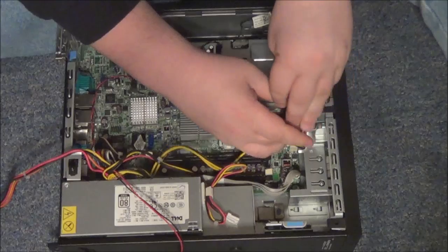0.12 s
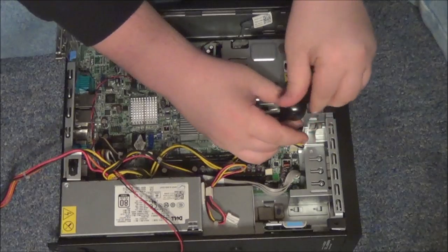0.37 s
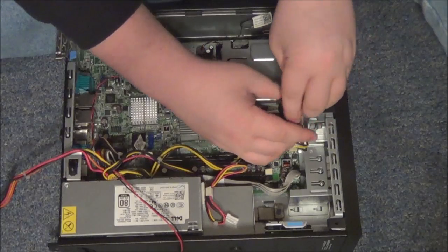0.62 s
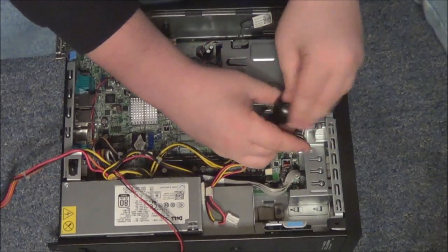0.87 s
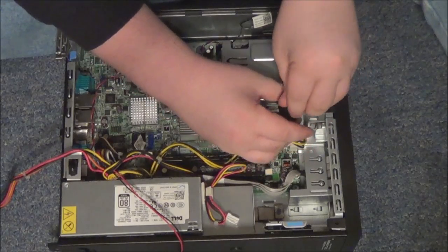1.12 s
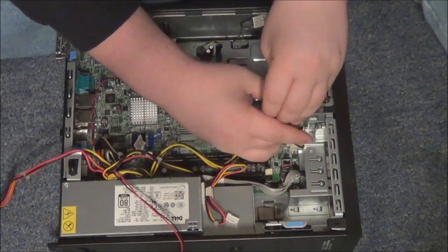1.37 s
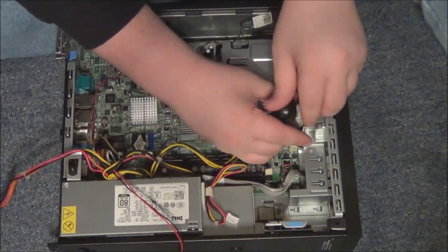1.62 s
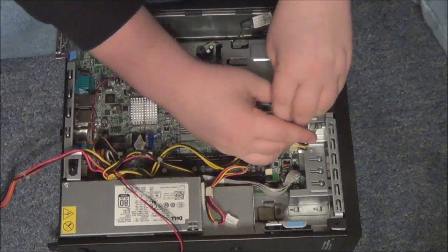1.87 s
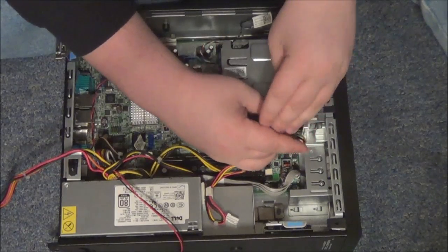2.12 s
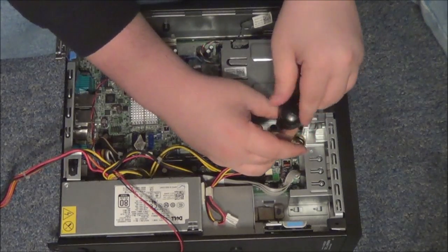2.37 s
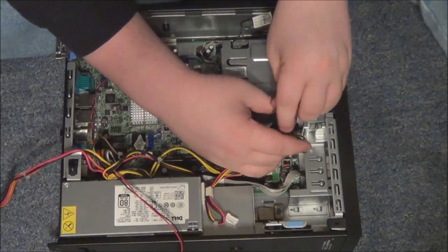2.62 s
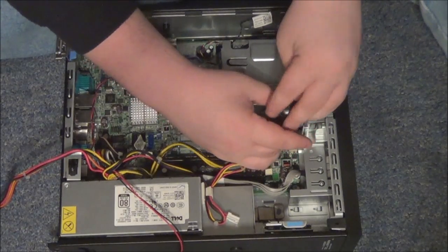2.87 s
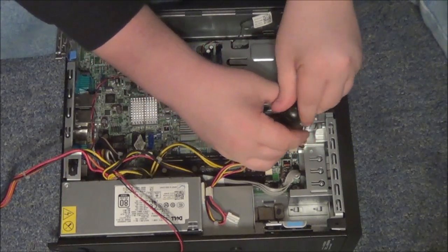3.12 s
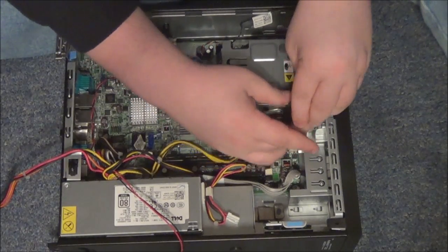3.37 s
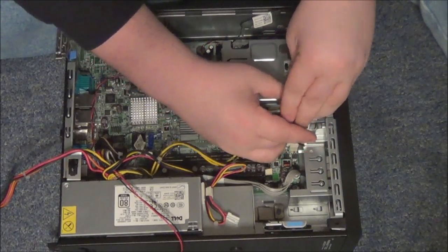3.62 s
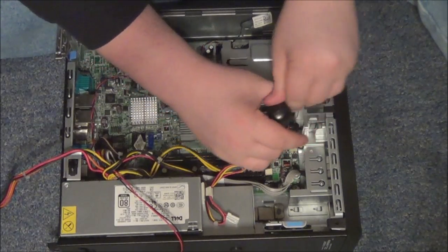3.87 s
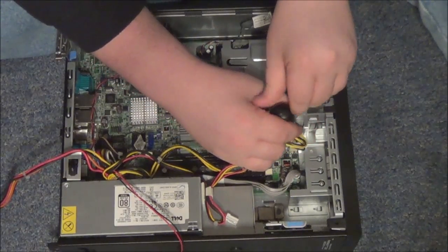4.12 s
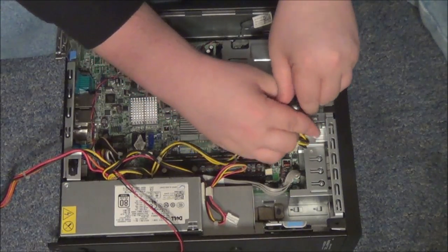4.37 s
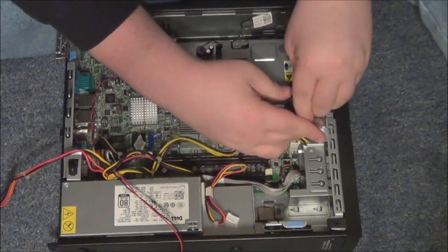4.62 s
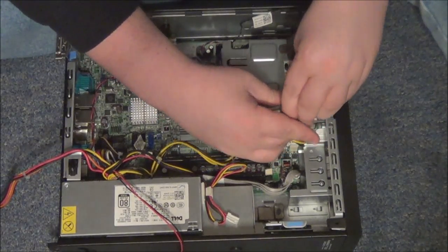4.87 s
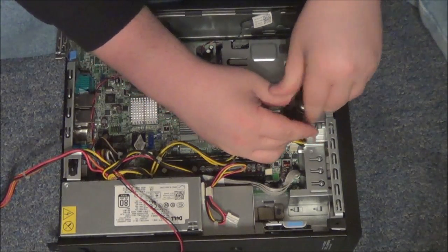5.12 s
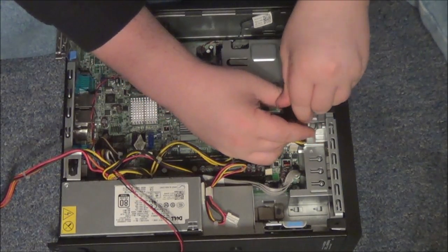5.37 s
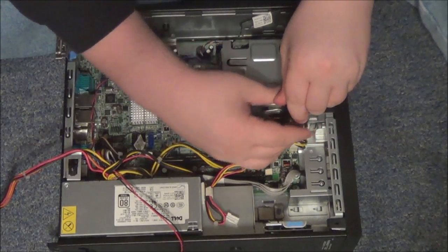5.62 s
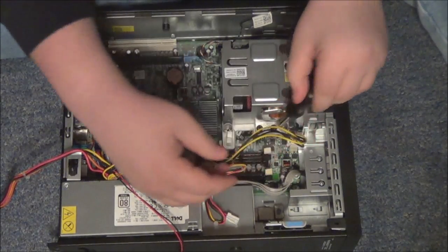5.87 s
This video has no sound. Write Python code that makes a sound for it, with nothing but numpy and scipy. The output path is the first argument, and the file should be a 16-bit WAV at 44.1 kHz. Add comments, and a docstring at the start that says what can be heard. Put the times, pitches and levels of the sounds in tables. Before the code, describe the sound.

A ratchet screwdriver clicks in quick, uneven bursts inside a metal computer case, with scrapes, small squeaks and several hard metallic knocks over faint room hum.

```python
"""A ratchet screwdriver is worked close by inside an open sheet-metal computer case on a carpet.
Its pawl ticks over the teeth as filtered noise bursts, and the handle rings on as beating pairs of sines.
The bit knocks and drags on the case: noise and uneven slips drive panel resonances, and some parts sing.
Hard blows also ring the steel shaft, and one bumps the case into the carpet.
Below lie a low room hum, a fan whirr, microphone hiss and thin high whines."""
import sys
import numpy as np
from scipy import signal
from scipy.fft import rfft, irfft, next_fast_len
from scipy.io import wavfile
from scipy.ndimage import uniform_filter1d

SR = 44100
rng = np.random.default_rng(int(sys.argv[2]) if len(sys.argv) > 2 else 0)


def field_ratio(decibels):
    """Amplitude ratio for a level in dB (20 dB per decade); scalars and array-likes work."""
    return 10 ** (np.asarray(decibels, dtype=float) / 20)


def generate_wav(signal):
    """Clip the signal to [-1, 1] and save it as 16-bit WAV at the path in sys.argv[1]."""
    frames = np.transpose(np.atleast_2d(signal))
    scaled = np.clip(frames, -1, 1) * 32767
    pcm = np.round(scaled).astype(np.int16)
    wavfile.write(sys.argv[1], SR, pcm)


N = 264600  # samples

# pawl ticks: (time [s], relative tick level [dB], relative lower handle ring level [dB],
# relative upper handle ring level [dB], pitch that the grip leaves free [Hz])
TICKS = [(0.0151, -19, -57, -17.5, 2310), (0.029, -17, -52, -23, 2340), (0.0546, -21, -42, -37, 2330),
         (0.0737, -20, -47, -33, 2260), (0.0919, -19.5, -54, -19.5, 2340), (0.106, -22, -63, -37, 2270),
         (0.1179, -19, -44, -21.5, 2340), (0.165, -18.5, -41, -22.5, 2380), (0.3158, -17, -35, -24, 2280),
         (0.3411, -14.5, -46, -20, 2350), (0.374, -16.5, -51, -50, 2200), (0.4919, -19, -38, -29.5, 2270),
         (0.5592, -25.5, -46, -25, 2290), (0.6045, -24, -52.5, -41, 2260), (0.6396, -19, -33, -27, 2190),
         (0.664, -16, -22, -28, 2270), (0.6855, -15, -17, -22, 2320), (0.716, -17.5, -28, -34, 2170),
         (0.743, -21, -59, -16.5, 2336), (0.771, -20.5, -33, -23.5, 2236), (0.8113, -21, -59, -19.5, 2340),
         (0.8952, -19, -43, -30, 2330), (0.9419, -17, -39, -41, 2150), (0.9966, -26.5, -33, -37, 2100),
         (1.0131, -27, -45, -16, 2243), (1.326, -20.5, -43, -26.5, 2336), (1.37, -19.5, -34, -31, 2336),
         (1.4506, -30, -29, -29.5, 2054), (1.5853, -25.5, -30.5, -32, 2070), (1.71, -29.5, -30, -31, 2085),
         (1.827, -23, -32, -26, 2360), (1.8785, -20.5, -50, -21.5, 2336), (1.9076, -18, -54, -25, 2336),
         (1.923, -18, -54, -25, 2336), (1.9347, -22, -55, -33, 2320), (1.947, -19, -52, -22, 2336),
         (1.961, -22, -50, -31, 2180), (1.9715, -18, -47, -20.5, 2340), (1.982, -17, -50, -20, 2330),
         (1.993, -22, -48, -32, 2320), (2.0036, -21, -54, -19, 2370), (2.0347, -17, -54, -21, 2360),
         (2.1076, -20.5, -54, -25, 2360), (2.3204, -14.5, -40, -32, 2290), (2.428, -18.5, -40, -32, 2210),
         (2.535, -16.5, -34.5, -42, 2210), (2.6126, -17.5, -44, -44, 2100), (2.654, -15.5, -35, -32, 2172),
         (2.692, -17, -43, -35, 2310), (2.721, -14.5, -40, -33, 2170), (2.7404, -16, -31, -38, 2180),
         (2.7615, -12, -28, -43, 2290), (2.789, -30, -42, -43, 2300), (2.8482, -21.5, -33, -31, 2280),
         (2.9817, -20.5, -45, -43, 2140), (2.9993, -26, -41, -54, 2200), (3.12, -21.5, -59, -57, 2250),
         (3.177, -22, -42, -50, 2260), (3.197, -27, -40, -50, 2300), (3.218, -15, -44, -48, 2260),
         (3.261, -22.5, -54, -48, 2230), (3.3143, -20.5, -60, -55, 2200), (3.362, -22.5, -47, -52, 2280),
         (3.423, -25, -60, -49, 2160), (3.4357, -14.5, -35.5, -39, 2210), (3.5428, -22.5, -37.5, -34, 2172),
         (4.783, -22.5, -38.5, -37, 2224), (4.887, -25.5, -36, -32, 2172), (5.308, -23.5, -35.5, -31, 2172)]
# centres of the overlapping ranges of the case: (frequency [Hz])
RANGES_HZ = [650, 1100, 2000, 4500, 10000]


def evened(x):
    """Scales a signal to an rms of one."""
    return x / np.sqrt(np.mean(x ** 2) + 1e-20)


def read(points, hz):
    """Reads a curve of (frequency, value) points along a logarithmic frequency axis."""
    f, value = np.transpose(points)
    return np.interp(np.log(hz + 1), np.log(f + 1), value)


def add(mix, s, sound):
    """Lays a sound into the mix from s seconds on."""
    part = mix[round(s * SR):][:len(sound)]
    part += sound[:len(part)]


def resonances(peaks, hz, between_db):
    """Causal response: a flat part plus single resonances of alternating sign."""
    response = field_ratio(between_db)
    for k, (f, width, db) in enumerate(peaks):
        response = response + (-1) ** k * field_ratio(db) / (1 + 2j * (hz - f) / width)
    return response


def coloured(x, response):
    """Filters a signal through a frequency response and lets it ring out for 4096 samples."""
    size = next_fast_len(len(x) + 8192)
    return irfft(rfft(x, size) * response(np.fft.rfftfreq(size, 1 / SR)), size)[:len(x) + 4096]


def background():
    """Smooth noise with whirring bands, slightly patchy, and thin steady whines."""
    # hum and hiss: (frequency [Hz], relative level per hertz [dB])
    hum = [(25, -16), (45, -7), (75, -8), (150, -7.5), (330, -9), (550, -8), (895, -13), (2000, -15.5),
           (4150, -19), (8000, -22), (13000, -22)]
    # fan bands standing out of the hum: (frequency [Hz], width [Hz], level above it [dB])
    whirr = [(118, 24, 6), (209, 22, 8), (283, 28, 10), (392, 50, 8), (480, 25, 5), (3570, 260, 10),
             (10700, 140, 4)]
    # likeness of the two sides: (frequency [Hz], correlation)
    likeness = [(60, 1), (180, 0.96), (550, 0.77), (1650, 0.04), (4970, 0.42), (15000, 0.97)]
    # the background rises and sinks: (time [s], level [dB])
    fades = [(0.0, -35), (0.15, -39.5), (2.3, -41), (3.6, -40), (4.15, -47), (4.64, -44.5), (6.0, -44.5)]
    # steady whines: (frequency [Hz])
    whine_hz = [9975, 11630, 15735]
    # their peaks against the rms of the noise: (level [dB])
    whine_db = [-24, -25, -15]
    frames, hz = N // 1024 + 5, np.fft.rfftfreq(4096, 1 / SR)
    a, b, c, d, patches = rng.standard_normal((frames, 2049, 5)).T
    patches = uniform_filter1d(patches, size=40, axis=0)  # over frequency
    patches = evened(uniform_filter1d(patches, size=3, axis=1))  # over time
    same = np.clip(read(likeness, hz), -1, 1)[:, None]
    left, other = a + 1j * b, c + 1j * d
    spectra = np.array([left, same * left + np.sqrt(1 - same ** 2) * other])
    lift = np.sqrt(1 + sum(field_ratio(db) ** 2 / (1 + (2 * (hz - f) / w) ** 4) for f, w, db in whirr))
    below_top_whine = hz < whine_hz[-1]  # the noise stops at the highest whine
    spectra *= (lift * below_top_whine)[:, None] * field_ratio(read(hum, hz)[:, None] + patches)
    noise = evened(signal.istft(spectra, nperseg=4096, noverlap=3072)[1][:, :N])
    t = np.arange(N) / SR
    whine = sum(field_ratio(db) * np.sin(2 * np.pi * f * t) for f, db in zip(whine_hz, whine_db))
    return field_ratio(np.interp(t, *np.transpose(fades))) * (noise + whine)


def room(x):
    """Sparse echoes of random sign, other ones for each side, duller as they die."""
    taps = np.zeros((2, SR // 2))
    # one echo at a random place in every 20 samples
    at = np.arange(60, SR // 2 - 20, 20) + rng.integers(0, 20, (2, (SR // 2 - 61) // 20))
    np.put_along_axis(taps, at, rng.choice([-1., 1.], at.shape), 1)
    hz, t, z = signal.stft(taps, SR, nperseg=256)
    t60 = read([(500, 0.49), (4000, 0.28), (14000, 0.21)], hz)[:, None]  # s
    tone_db = read([(300, 1.0), (1500, -1.0), (5000, 5.5), (9000, 2.5), (13000, -14.0)], hz)[:, None]
    tail = signal.istft(z * field_ratio(-60 * t / t60 + tone_db), SR, nperseg=256)[1]
    return signal.fftconvolve(x[None], tail / np.linalg.norm(tail[0]), axes=1)[:, :N]


def thump():
    """The hardest blow bumps the case into the carpet: a low sine swells for a moment and dies."""
    out, t = np.zeros(N), np.arange(16000) / SR
    swell = field_ratio(-36.5 - 60 * t / 0.35) * np.minimum(t / 0.018, 1)
    add(out, 4.455, swell * np.sin(2 * np.pi * 155.5 * t))
    return out


def case_bands(x):
    """Splits a force into overlapping ranges of the panels; every contact point favours other resonances."""
    # nominal panel resonances: (frequency [Hz], width [Hz], level [dB])
    case_modes = [(691, 14, -3), (807, 15, 1.5), (970, 130, 0.5), (1081, 104, 6.5), (1330, 105, -6.5),
                  (1492, 14, 1), (1605, 89, -2.5), (1718, 15, 2), (2000, 13, -5.5), (2380, 32, 0.5),
                  (2498, 42, -9), (3350, 16, 1.5), (3647, 32, -9), (4013, 106, -1), (4570, 65, -8),
                  (5760, 27, -14), (7100, 69, -14), (8540, 430, -36), (11100, 67, -21)]
    # overall tone of the case: (frequency [Hz], level [dB])
    case_tone = [(150, -35), (450, -17), (650, -9.5), (12500, -11), (14000, -23), (17000, -50)]
    spot_db, spot_detune = 2.0, .012  # spread of level [dB] and pitch [share of Hz]; a hand shifts the panels
    spot = rng.standard_normal((len(case_modes), 2))
    panels = [(f * (1 + spot_detune * v), w, db + spot_db * u)
              for (f, w, db), (u, v) in zip(case_modes, spot)]

    def band(k):
        share = [(f, float(j == k)) for j, f in enumerate(RANGES_HZ)]
        return lambda hz: read(share, hz) * field_ratio(read(case_tone, hz)) * resonances(panels, hz, -10)
    return [coloured(x, band(k)) for k in range(len(RANGES_HZ))]


def slips(rise, fall, order=1):
    """Uneven slips of steel on steel, and the swell of the push that drives them."""
    t = np.arange(-rise, fall, 1 / SR)
    sizes = field_ratio(4.9 * np.minimum(rng.exponential(1, len(t)), 3))
    force = (rng.random(len(t)) < 8000 / SR) * sizes * rng.standard_normal(len(t))  # 8000 slips a second
    ends_db = -16.5  # start and end of a stroke under its hardest push
    push = field_ratio(ends_db * np.where(t < 0, -t / rise, t / fall) ** order)
    return force, push * signal.windows.tukey(len(t), .1)


def drags():
    """The bit drags in the screw head: its slips feed the whole case, dull or bright."""
    # strokes: (hardest push [s], rise [s], fall [s], relative level [dB],
    # tilt per step up from the low panels [dB])
    strokes = [(0.018, 0.017, 0.13, -35.5, -5.5), (0.14, 0.031, 0.082, -36.5, -7),
               (0.58, 0.073, 0.13, -34.5, -3), (0.672, 0.032, 0.042, -24, -2.5),
               (0.7, 0.04, 0.043, -25.5, -1), (0.955, 0.0091, 0.035, -35, -17),
               (1.122, 0.011, 0.018, -32, -7.5), (1.83, 0.067, 0.044, -35, -5.5),
               (1.98, 0.12, 0.18, -32, -11), (2.73, 0.029, 0.078, -28, -5.5),
               (2.775, 0.015, 0.099, -29.5, -7), (3.01, 0.06, 0.046, -34, -7),
               (3.205, 0.017, 0.1, -32.5, -7.5), (3.815, 0.054, 0.0091, -36, -6),
               (4.449, 0.02, 0.0043, -28, -1.5), (5.79, 0.023, 0.062, -37.5, -5),
               (5.836, 0.023, 0.028, -36, 3)]
    out = np.zeros(N)
    for s, rise, fall, db, tilt_db in strokes:
        force, push = slips(rise, fall)
        low, body, middle, high, top = case_bands(force)
        steps = [low + field_ratio(-9.0) * body, middle, high, top]
        for step, part in enumerate(steps):
            level = field_ratio(db - 3.0 + tilt_db * step) * field_ratio(-6.0 * (step > 2))
            add(out, max(s - rise, 0), level * push * evened(part[:len(push)]))
    return out


def singing():
    """Rubbing sets one part of the case or tool singing: slips through a single narrow resonance."""
    # strokes: (hardest push [s], rise [s], fall [s], relative level [dB], sung pitch [Hz])
    strokes = [(0.06, 0.091, 0.16, -33.5, 2290), (0.121, 0.03, 0.04, -41, 1080),
               (0.578, 0.02, 0.075, -28, 1069), (0.695, 0.05, 0.1, -30, 2250), (0.7, 0.03, 0.03, -28, 1790),
               (0.701, 0.03, 0.025, -27.5, 4000), (0.705, 0.03, 0.06, -18, 1063),
               (0.984, 0.05, 0.04, -37, 1683), (0.99, 0.06, 0.06, -31.5, 2110),
               (1.375, 0.015, 0.03, -42, 1057), (1.838, 0.02, 0.028, -33, 1060),
               (1.85, 0.03, 0.04, -39, 1920), (1.96, 0.16, 0.15, -32.5, 2340),
               (1.971, 0.074, 0.069, -39, 1005), (2.062, 0.008, 0.04, -36, 4150),
               (2.16, 0.025, 0.07, -45, 3900), (2.3, 0.02, 0.022, -41, 1004),
               (3.22, 0.035, 0.054, -32, 1062), (3.385, 0.024, 0.026, -39.5, 1013),
               (4.005, 0.015, 0.09, -31, 2450), (4.41, 0.025, 0.055, -26.5, 1077),
               (5.79, 0.015, 0.015, -37, 1560), (5.819, 0.008, 0.01, -31, 1650),
               (5.836, 0.03, 0.014, -30, 4400), (5.839, 0.02, 0.026, -39, 1043)]
    lid_hz, lid_width = 1072, 12  # Hz; the width grows with the square of the pitch
    out = np.zeros(N)
    for s, rise, fall, db, sung_hz in strokes:
        force, push = slips(rise, fall, order=2)
        mode = [(sung_hz, lid_width * (sung_hz / lid_hz) ** 2, 0)]
        swing = coloured(force, lambda hz: resonances(mode, hz, -48.0) / (1 + (hz / 5000) ** 4))
        # the rubbing keeps the swing up
        held = swing / np.sqrt(uniform_filter1d(swing ** 2, size=900) + 1e-12)
        sung = field_ratio(db - 4.0) * push * held[:len(push)]
        add(out, max(s - rise, 0), sung[round(max(rise - s, 0) * SR):])
    return out


def knock_levels(panels_db, centre_hz, fall_db, tip_db):
    """Level in each range: the panels round the contact point plus the high ring of the steel tip."""
    hz = np.array(RANGES_HZ)
    panels = field_ratio(panels_db - fall_db * abs(np.log2(hz / centre_hz)))
    tip = field_ratio(tip_db - 4.5 * abs(np.log2(hz / 10000)))  # falls 4.5 dB per octave from 10 kHz
    return 10 * np.log10(panels ** 2 + tip ** 2)


def knocks():
    """One hard contact and a crack, then the panels shake with a slight rattle."""
    # blows on the case: (time [s], relative panel level [dB], centre of the struck panels [Hz],
    # fall from it [dB per octave], relative steel tip level [dB])
    blows = [(0.0495, -15, 706, 15.5, -40), (0.061, -19, 687, 28, -50), (0.3405, -22.5, 1160, 3.5, -31),
             (0.9407, -26, 1150, 4, -41), (1.0275, -14.5, 950, 6, -46), (1.04, -25, 890, 7, -55),
             (1.056, -27.5, 850, 5, -55), (2.058, -29, 990, 4, -62), (2.069, -27, 1010, 7, -62),
             (2.765, -22.5, 1590, 5.5, -25.5), (2.953, -30.5, 1370, 8, -55), (3.22, -24.5, 1000, 12, -48),
             (3.823, -10, 1580, 7.5, -16), (3.992, -24.5, 1730, 4, -16.5), (4.088, -33.5, 1500, 5.5, -36.5),
             (4.183, -36.5, 3400, 7, -61), (4.317, -10.5, 1780, 5, -21), (4.447, -7.5, 1690, 5.5, -15.5),
             (4.606, -19.5, 1040, 13.5, -46), (5.808, -37, 2500, 6, -23), (5.816, -34.5, 2500, -2, -24.5),
             (5.834, -33, 750, 10, -42)]
    # dull blows are smothered, brighter ones shake the panels longer: (centre [Hz], t60 [s])
    shake = [(950, 0.09), (1350, 0.24)]
    lead = 300  # samples in which the filtered blow builds up
    out, t = np.zeros(N), np.arange(16000) / SR
    for s, *blow in blows:
        levels_db = knock_levels(*blow)
        t60 = np.interp(blow[1], *np.transpose(shake))
        rattle = field_ratio(2.5 * evened(uniform_filter1d(rng.standard_normal(len(t)), size=150)))
        crack = field_ratio(-60 * t / 0.017)
        force = rng.standard_normal(len(t)) * (crack + rattle * field_ratio(-1.5 - 60 * t / t60))
        force *= np.minimum(t / 0.0017, 1)
        force[30] += field_ratio(19)  # the hard contact
        for db, part in zip(levels_db, case_bands(np.r_[np.zeros(lead), force])):
            loudness = np.sqrt(np.mean(part[lead:lead + 500] ** 2))
            add(out, s - lead / SR, field_ratio(db - 7.5) * part / loudness)
    return out


def clangs():
    """The tip strikes: a short scatter of contacts sets the shaft modes near a centre ringing."""
    # modes of the steel shaft: (frequency [Hz], width [Hz], level [dB])
    shaft = [(4180, 130, 8.5), (5710, 89, 0.5), (6400, 120, 2), (7170, 75, -12), (7620, 50, -10),
             (8530, 170, 4.5), (9000, 110, 3.5), (9810, 100, 1), (10360, 110, 0.5), (11100, 110, 1),
             (11470, 170, -2.5), (13200, 110, -4)]
    # strikes: (time [s], level [dB], centre of the modes that sound [Hz], fall from it [dB per octave], t60 [s])
    strikes = [(2.765, -31, 9000, 16, .06), (3.821, -18.5, 10000, 29, 0.13), (3.99, -13.5, 9600, 18, .22),
               (4.085, -37, 9800, 24, .1), (4.317, -22, 4280, 9, 0.15), (4.447, -18.5, 5140, 12, 0.14),
               (5.81, -23, 10500, 2, .03), (5.816, -26, 10000, 8, .04), (5.832, -33, 8600, 35, 0.18)]
    out, t = np.zeros(N), np.arange(12000) / SR
    for s, db, centre_hz, fall_db, t60 in strikes:
        envelope = field_ratio(-60 * t / 0.019) + field_ratio(-13.5 - 60 * t / t60)
        force = rng.standard_normal(len(t)) * envelope * np.minimum(t / 0.00095, 1)
        modes = [(f, w, mode_db - fall_db * abs(np.log2(f / centre_hz))) for f, w, mode_db in shaft]
        clang = coloured(force, lambda hz: resonances(modes, hz, -80))
        add(out, s, field_ratio(db) * clang / np.sqrt(np.mean(clang[:400] ** 2)))
    return out


def handle():
    """Each tooth rings the handle: pairs of close sines beat and waver as they die."""
    # nominal rings, the last one following the fourth: (frequency [Hz], partner [Hz], t60 [s])
    rings = [(1727, 1655, 0.13), (2089, 2020, 0.19), (2172, 2250, 0.17), (2336, 2240, 0.045),
             (5300, 5570, 0.14)]
    # teeth that sound the last ring by itself, without its partner: (time [s], level [dB])
    glints = [(0.4953, -38.5), (0.5636, -42), (0.608, -41)]
    glint_db = -23.5  # last ring under the fourth
    grip_db_per_hz = 0.085  # the fingers damp an upper ring more, the further it lies from the free pitch
    detune, wobble_db = .006, 1.5  # the grip shifts each ring (at most, share of Hz) and makes it waver (rms)
    low_grip_hz = (rings[1][0] + rings[2][0]) / 2
    out, t = np.zeros(N), np.arange(6000) / SR
    for s, _, lower_db, upper_db, free_hz in TICKS:
        ring_db = [lower_db] + [upper_db - grip_db_per_hz * abs(hz - free_hz) for hz, _, _ in rings[1:-1]]
        ring_db.append(ring_db[-1] + glint_db)
        wobble = field_ratio(wobble_db * evened(uniform_filter1d(rng.standard_normal(len(t)), size=250)))
        for k, ((hz, partner_hz, t60), db) in enumerate(zip(rings, ring_db)):
            phase, shift, balance = rng.random(3)
            if k == 0 and free_hz < low_grip_hz:
                hz, partner_hz = partner_hz, hz  # a low grip frees the lower one of the lowest pair
            shifted = t * (1 + detune * (2 * shift - 1))
            partner = np.sin(2 * np.pi * (partner_hz * shifted + phase))
            pair = np.sin(2 * np.pi * hz * shifted) + field_ratio(-9.0 + 6.8 * balance) * partner
            add(out, s, field_ratio(db - 3.0 - 60 * t / t60) * wobble * pair * np.minimum(t / 0.0032, 1))
    _, hz, t60 = rings[-1]
    for s, db in glints:
        add(out, s, field_ratio(db - 60 * t / t60) * np.sin(2 * np.pi * hz * t))
    return out


def pawl():
    """Each tooth snaps the pawl: a sharp noise tick and a short fizz through its resonances."""
    # nominal bands of the free pawl: (frequency [Hz], width [Hz], level [dB])
    free = [(7430, 72, 3), (7500, 4400, -16), (10400, 3700, 3.5), (12600, 620, 9.5), (12260, 330, -4)]
    # with the wrist pushing, it is held tight and rings in other, mostly narrower bands:
    # (frequency [Hz], width [Hz], level [dB])
    held_tight = [(6020, 140, -11), (6870, 290, 2), (8370, 270, -6), (10140, 680, 2.5), (11970, 410, 4.5),
                  (15100, 330, 0.5)]
    # spans of pushing: (from [s], to [s])
    pushing = [(0, .85), (1.8, 2.15)]
    out, t = np.zeros(N), np.arange(6000) / SR
    for s, tick_db, *_ in TICKS:
        loaded = any(a < s < b for a, b in pushing)
        parts, between_db = (held_tight, -9.0) if loaded else (free, -3.0)
        detune = rng.uniform(-1, 1, len(parts))
        bands = [(f * (1 + .03 * d), w, db + 4 * d) for (f, w, db), d in zip(parts, detune)]
        envelope = field_ratio(-60 * t / 0.017) + field_ratio(-4.5 - 60 * t / 0.12)  # tick and fizz
        force = rng.standard_normal(len(t)) * envelope * np.minimum(t / 0.00052, 1)

        def response(hz):
            tilt = np.clip(hz / 7000, 0, 1) ** 0.5  # thin below 7 kHz
            return resonances(bands, hz, between_db) * tilt / (1 + (hz / 15600) ** 40)
        tick = coloured(force, response)
        add(out, s, field_ratio(tick_db - 9.5) * tick / np.sqrt(np.mean(tick[:130] ** 2)))
    return out


def scene():
    """The tool sits in the middle, the body of the case a little to the left, both with room echoes."""
    # the case sounds louder on the left: (frequency [Hz], level each way [dB])
    lean = [(200, 2), (600, 1), (1500, 1.5), (4000, 0.5)]
    tool = pawl() + handle() + clangs()
    case = knocks() + drags() + singing()
    sides = np.array([coloured(case, lambda hz: field_ratio(side * read(lean, hz)))[:N] for side in (1, -1)])
    echoes = room(field_ratio(-8.5) * tool + field_ratio(-10.5) * case)
    return tool + sides + echoes + thump() + background()


def low_pass(x):
    """Removes everything above the highest recorded frequency."""
    return signal.sosfilt(signal.butter(12, 17160, fs=SR, output="sos"), x)


def record(dry):
    """The input stage rounds off the highest peaks with a tanh knee."""
    ceiling = .95  # full scale is 1; the knee starts at half the ceiling
    over = np.maximum(abs(dry) - ceiling / 2, 0)
    rounded = np.sign(dry) * (abs(dry) - over + ceiling / 2 * np.tanh(2 * over / ceiling))
    return low_pass(rounded)


dry = scene()
out = record(dry)
generate_wav(out)
```